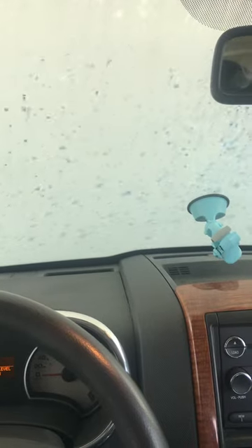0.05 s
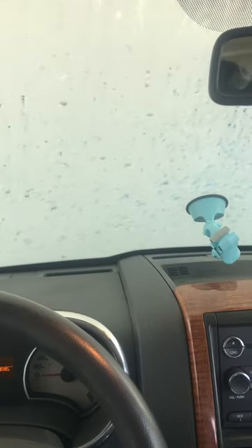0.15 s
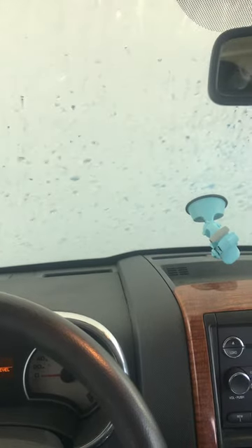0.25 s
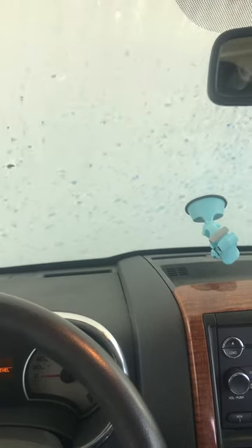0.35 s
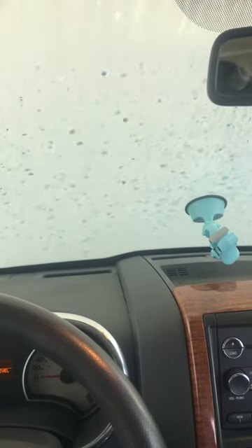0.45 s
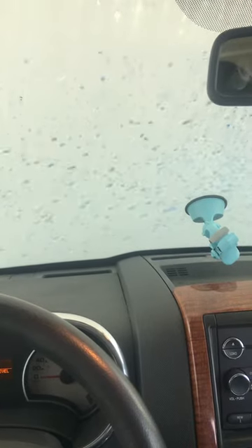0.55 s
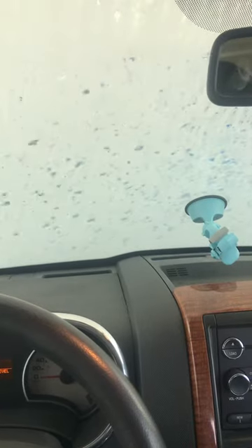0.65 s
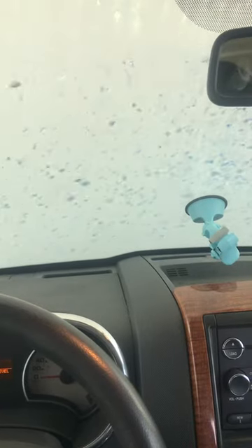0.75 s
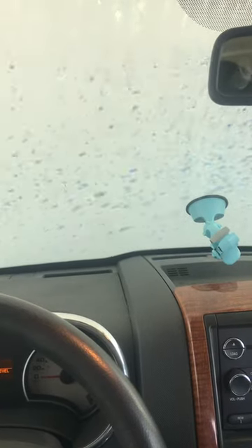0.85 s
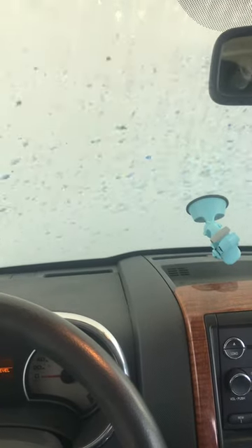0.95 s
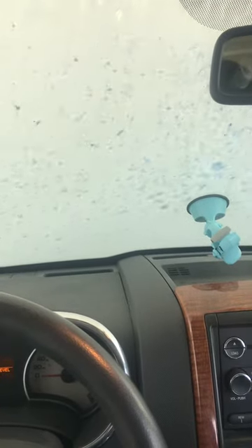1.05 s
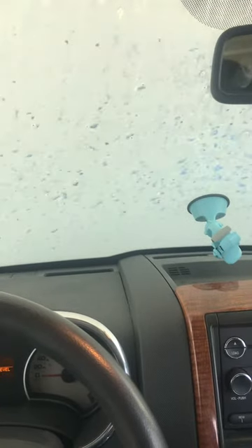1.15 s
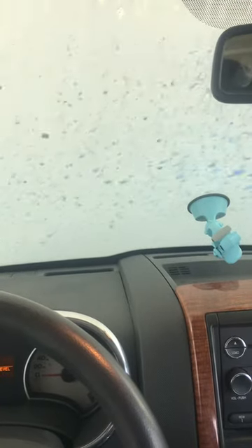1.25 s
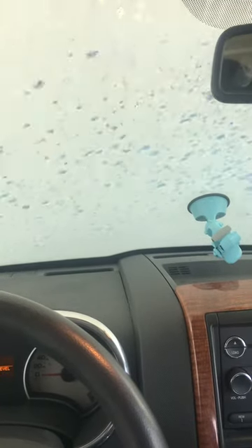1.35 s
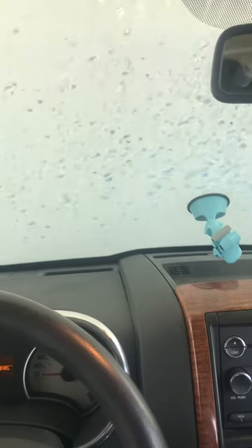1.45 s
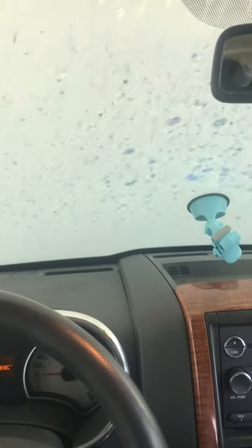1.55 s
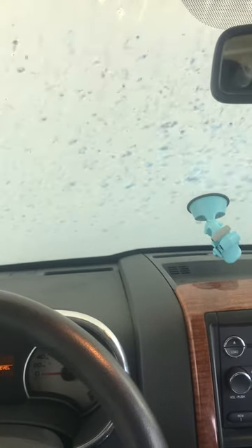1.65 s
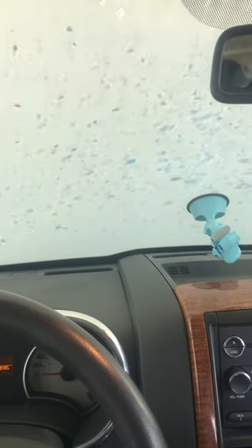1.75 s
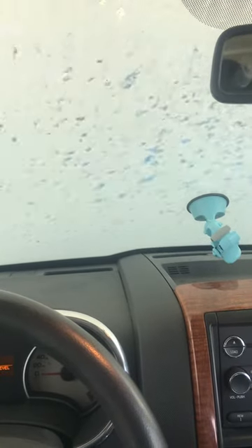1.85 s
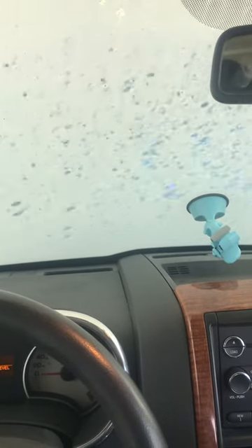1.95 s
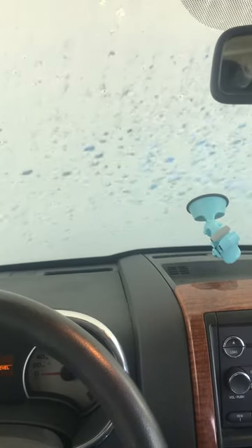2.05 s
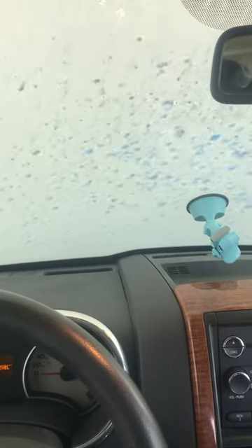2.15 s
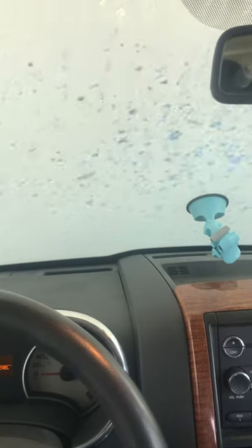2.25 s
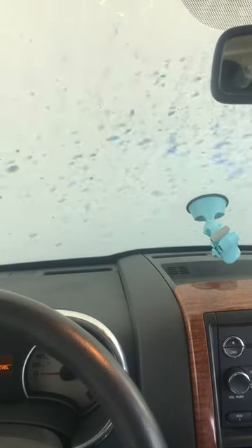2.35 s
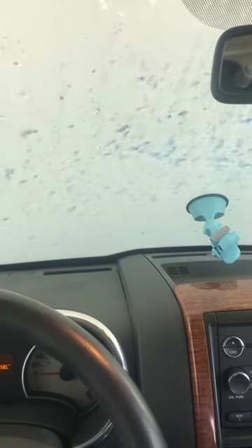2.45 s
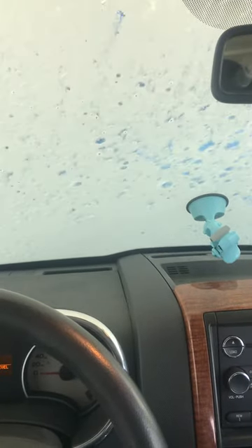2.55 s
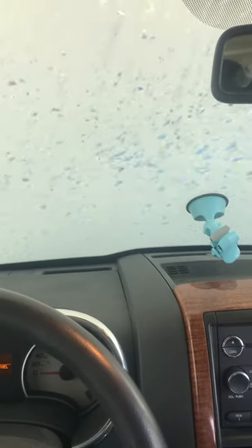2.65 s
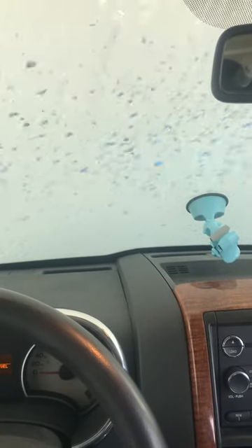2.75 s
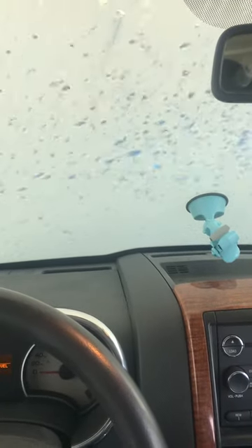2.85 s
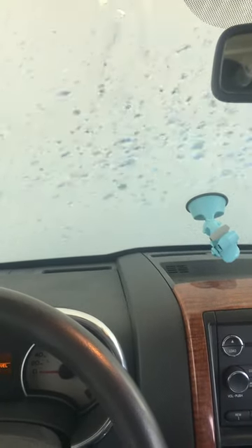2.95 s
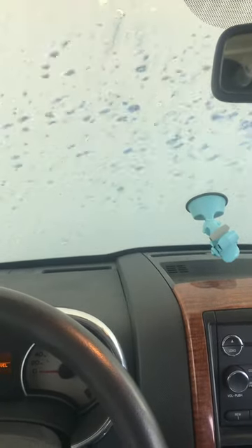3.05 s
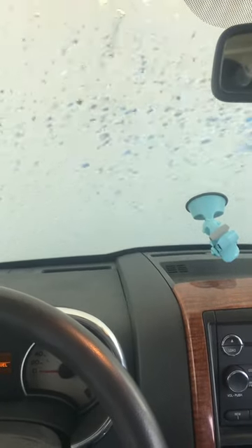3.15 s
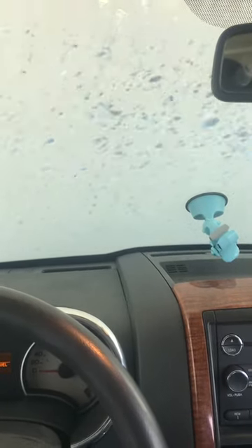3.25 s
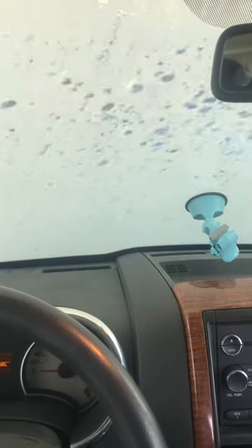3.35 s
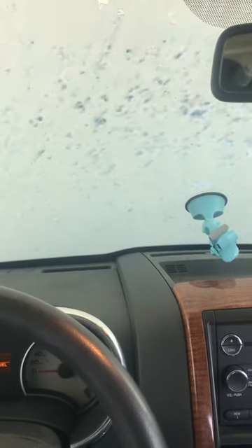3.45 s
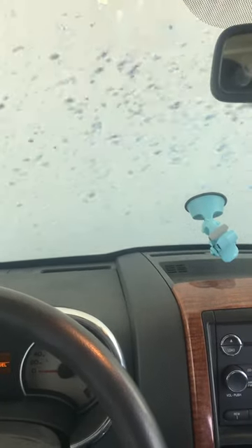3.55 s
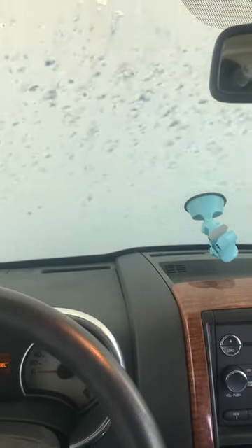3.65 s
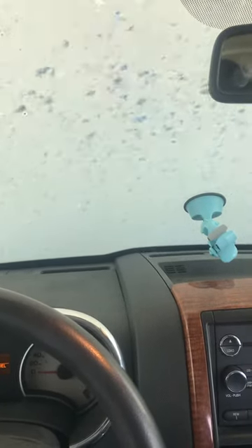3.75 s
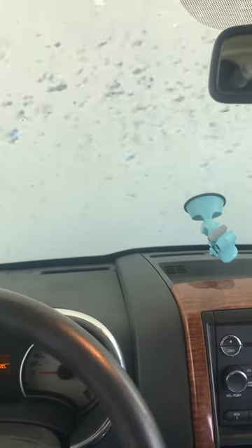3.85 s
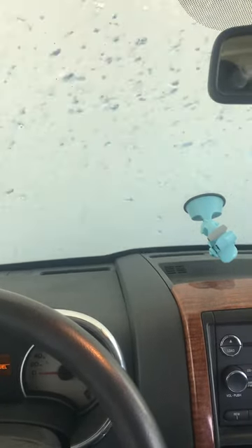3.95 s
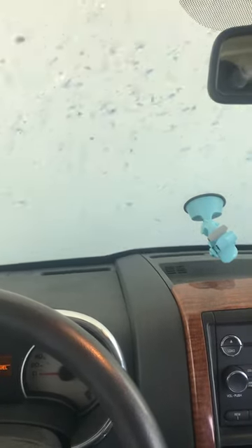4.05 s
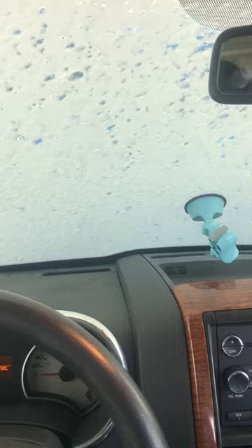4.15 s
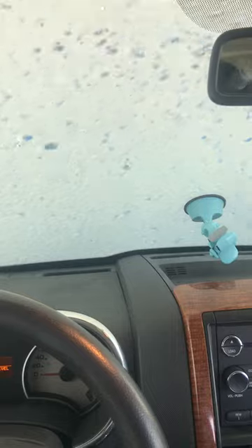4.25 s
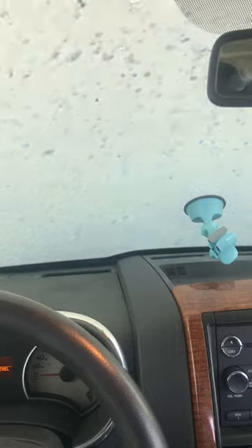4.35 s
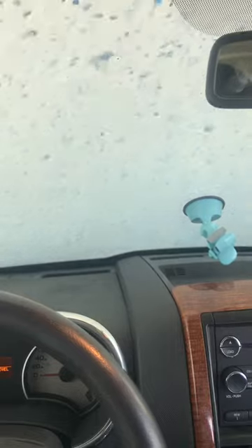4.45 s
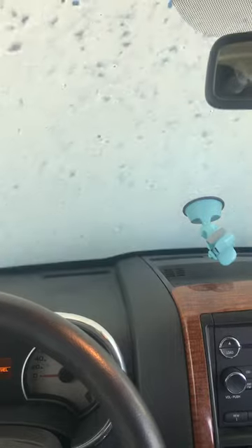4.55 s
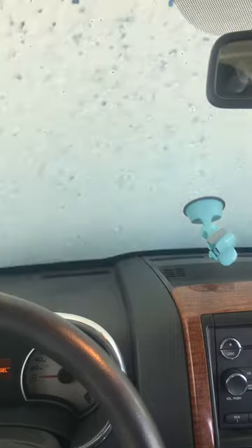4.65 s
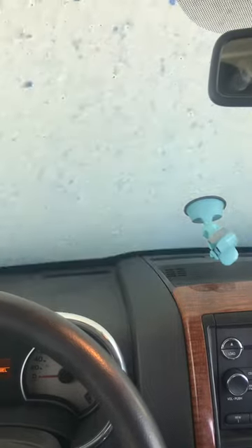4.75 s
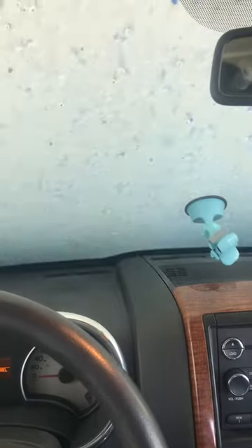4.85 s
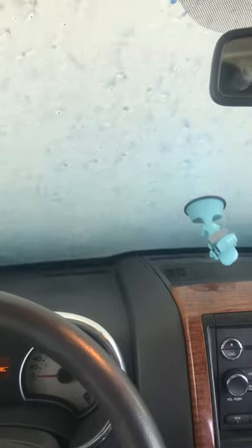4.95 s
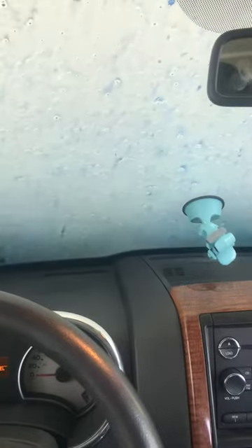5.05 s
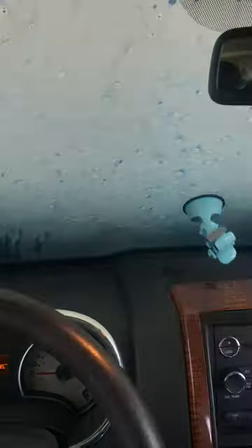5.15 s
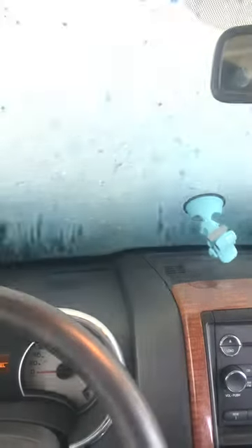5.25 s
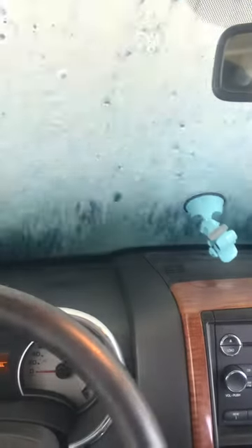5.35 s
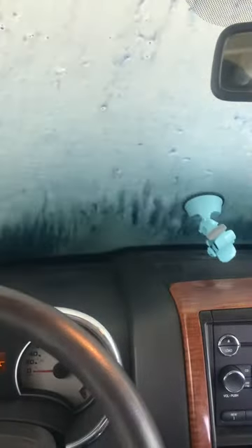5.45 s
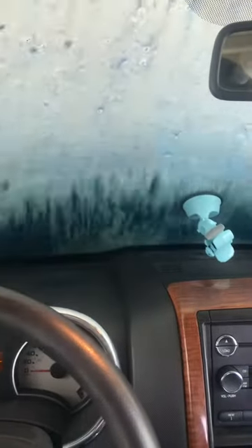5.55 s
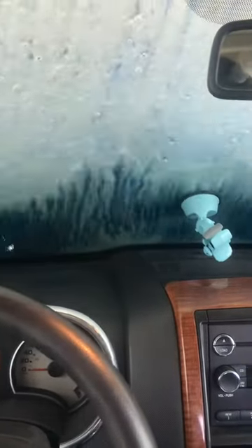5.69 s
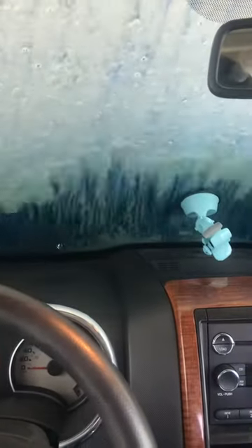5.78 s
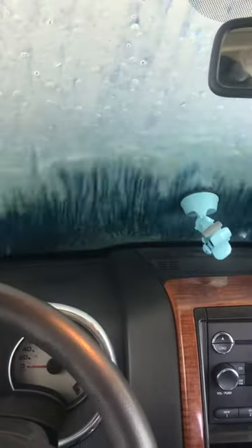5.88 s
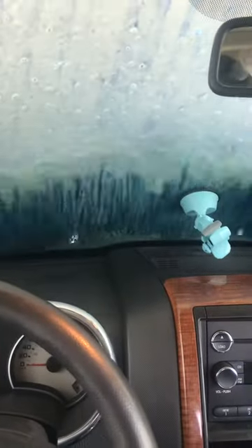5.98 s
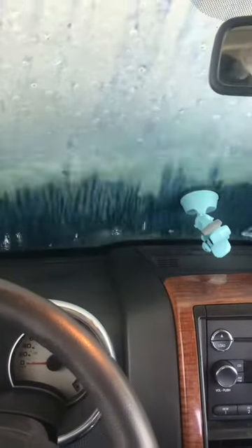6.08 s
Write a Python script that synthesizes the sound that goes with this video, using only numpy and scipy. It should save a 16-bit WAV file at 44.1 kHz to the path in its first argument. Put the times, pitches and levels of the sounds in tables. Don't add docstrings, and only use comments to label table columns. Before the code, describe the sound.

Heard from inside a closed car in a wash: a low, boomy rumble of panels drummed by a spinning cloth brush, with muffled spray hiss and quick irregular swishes. Soft foam knocks dot the trim. Near the end the wet strips hit the windscreen, cracking and tapping, and the hiss grows bright and loud. A phone microphone sits in the padded cabin.

```python
import sys
import numpy as np
from scipy import signal
from scipy.fft import rfft, irfft
from scipy.io import wavfile
from scipy.ndimage import uniform_filter1d

SR = 44100
rng = np.random.default_rng(int(sys.argv[2]) if len(sys.argv) > 2 else 0)


def file_out(sig):
    cols = np.atleast_2d(sig).T
    lim = np.clip(cols, -1, 1)
    pcm = np.round(lim * 32767).astype(np.int16)
    wavfile.write(sys.argv[1], SR, pcm)


def voltage_ratio(decibels):
    exponent = np.asarray(decibels, float) / 20
    return 10 ** exponent


N = 269892
T = np.arange(N) / SR
HZ = np.fft.rfftfreq(N, 1 / SR) + 1e-3

# frequency in Hz, width in Hz, level in dB.
CABIN_MODES = [
    [(35.6, 3.9, -2.5), (53, 6.7, -2), (65, 41, -10)],
    [(101, 15, -1), (107.4, 26.3, 18)],
    [(128.5, 7.4, -11.5), (140.7, 10.8, 0), (163.2, 25.3, -5)],
    [(200.8, 30.3, 0.5), (256, 62, -2), (325.5, 53.5, -0.5), (403.3, 62, -5.5), (463, 25, -12)],
]
DRUM_DB = (-39, -36, -35, -37.5)
DRUM_CONTACT_DB = (-2, -2, 0.5, 0.6)
# peak in seconds, rms level in dB, mode in Hz.
THUMPS = [(0.209, -29.5, 52.6), (0.308, -36, 57), (0.508, -38, 51), (0.676, -37, 49), (0.969, -30.5, 52.4),
          (1.164, -30, 48.4), (1.419, -42, 52), (1.791, -37, 52.4), (2.264, -36, 46.6), (2.555, -33, 47.6),
          (2.723, -34, 53), (2.862, -39, 49.6), (3.035, -35, 51), (3.207, -39, 54), (3.294, -34, 49.6),
          (3.361, -49, 54), (3.486, -32, 52.4), (3.64, -32, 49.6), (3.718, -38, 44.1), (3.808, -36, 55.1),
          (3.962, -46, 46.5), (4.09, -41, 50), (4.212, -36, 49.6), (4.67, -37, 53), (4.801, -33, 64),
          (4.911, -35, 52), (5.094, -29.5, 55.4), (5.465, -30, 38.4), (5.552, -29, 47.7),
          (5.671, -26, 57.3), (5.796, -30, 66.6), (5.898, -38, 70.6), (5.982, -28, 64), (6.063, -31, 71.6)]
# peak in seconds, rms level in dB, panel ring in Hz.
BOOMS = [(0.11, -30, 130.6), (0.403, -31, 116.5), (0.45, -29, 144.6), (0.493, -33, 160.7),
         (0.627, -33, 107.4), (0.656, -30, 157), (0.885, -34, 119.5), (1.042, -30.5, 131.4),
         (1.086, -29.5, 142), (1.219, -28.5, 121), (1.265, -26.5, 103), (1.364, -24, 140),
         (1.492, -37, 111), (1.515, -31, 140.5), (1.602, -27, 158), (1.611, -33, 110.3),
         (1.675, -30.5, 102.5), (1.721, -27, 109.7), (1.866, -30, 120), (2.078, -31, 144.3),
         (2.154, -26, 140.6), (2.247, -32, 144), (2.679, -22.5, 139.5), (2.734, -33, 121),
         (2.804, -30.5, 138.5), (3.207, -23, 128.4), (3.277, -29, 118.7), (3.326, -26.5, 127.3),
         (3.428, -33, 103.7), (3.492, -27.5, 111.2), (3.573, -25, 141.4), (3.64, -29, 149.3),
         (3.825, -23.5, 141.4), (3.872, -28, 132), (3.892, -32, 105), (3.93, -26.5, 136.4),
         (4.017, -28, 107.4), (4.075, -25.5, 129), (4.336, -29, 148.2), (4.51, -26.5, 123.6),
         (4.563, -30.5, 128.6), (4.612, -30, 122), (4.65, -29.5, 116), (4.746, -31.5, 143.8),
         (4.792, -28.5, 144.6), (4.876, -26, 148.3), (4.969, -26.5, 124.7), (5.013, -29.5, 139.6),
         (5.053, -27.5, 119.7), (5.129, -28, 113.6), (5.259, -23.5, 124), (5.306, -23.5, 114),
         (5.349, -24.5, 136.6), (5.399, -23, 132.3), (5.532, -26, 119.2), (5.581, -24, 147.7),
         (5.72, -25, 118), (5.802, -20, 123.0), (5.93, -22.5, 113.5), (5.985, -20.5, 118.2)]
# peak in seconds, rms level in dB, panel ring in Hz.
SLAPS = [(0.122, -40.5, 394), (0.194, -37, 400), (0.647, -35, 200), (0.794, -35, 294), (0.86, -36.5, 404),
         (0.85, -32, 189), (0.958, -35.5, 258), (1.098, -38, 231), (1.165, -39, 415), (1.592, -32.5, 288),
         (1.804, -33, 226), (1.856, -39.0, 366.5), (2.295, -37, 423), (2.606, -40, 382.0),
         (2.714, -38, 288), (2.812, -41, 447), (3.035, -32, 296.5), (3.133, -37, 293), (3.524, -40, 451),
         (3.983, -32, 290), (4.153, -36, 210), (4.177, -39, 402), (4.204, -38, 411), (4.514, -36.5, 402),
         (4.741, -30.5, 268), (4.763, -36, 213.0), (4.807, -37.5, 391), (4.873, -32.5, 200),
         (4.935, -33.5, 305), (4.965, -34, 211), (5.182, -36, 370), (5.25, -33.5, 400), (5.302, -41, 463.0),
         (5.346, -38, 389), (5.372, -39, 397.0), (5.563, -34.5, 374), (5.585, -37, 435), (5.595, -37, 200),
         (5.619, -35, 460), (5.653, -30, 397), (5.729, -29, 405), (5.815, -32, 393), (5.939, -27.5, 342.5),
         (5.98, -27, 341), (6.036, -33, 349.5)]
# peak in seconds, rms level in dB, ring in Hz.
KNOCKS = [(0.059, -40, 1070), (0.531, -41, 717.0), (0.581, -43, 1323.0), (0.782, -49.0, 1370),
          (0.794, -44, 706), (1.58, -43, 880), (1.84, -43, 1300), (1.93, -42, 960), (2.389, -44, 674),
          (2.511, -52, 1130), (2.471, -42, 897), (2.6, -40, 1050), (2.687, -47, 937.0),
          (2.863, -39, 1047.0), (2.943, -46, 600), (2.994, -43, 670), (3.113, -42, 1000), (3.358, -39, 720),
          (3.365, -41, 1240), (3.432, -38, 753.0), (3.437, -40, 1150), (3.43, -42, 1060), (3.526, -42, 955),
          (3.617, -45, 1070), (3.639, -44, 800), (3.714, -44, 834), (3.729, -40, 1220),
          (3.953, -45.5, 698.0), (4.151, -46, 1433.0), (4.152, -49, 1150), (4.157, -45.5, 662.0),
          (4.175, -45, 753.0), (4.221, -45.0, 735.0), (4.225, -36.5, 1158.0), (4.242, -46.5, 1150),
          (4.272, -47, 1300), (4.691, -48, 1158.0)]

# frequency in Hz, level in dB per Hz.
SHELL_SPECTRUM = [(260, -28), (450, 2.5), (615, -5.5), (768, -6), (840, -2), (905, -7), (1050, -8),
                  (1540, -14.5), (2720, -16), (6150, -26), (7800, -32.5), (8780, -33.5), (10300, -36),
                  (12900, -36), (15700, -36.5)]
# frequency in Hz, level in dB per Hz.
GLASS_SPECTRUM = [(260, -30), (450, 3.5), (597, -7), (827, -3), (1150, -9.5), (1520, -6.5), (2410, -3.5),
                  (4600, -7), (4920, -11.5), (6060, -13), (7130, -21.5), (9600, -30.5), (10300, -32.5),
                  (13900, -31), (15700, -32.5)]
# frequency in Hz, width in Hz, boost in dB.
TRIM_MODES = [(857, 30, 3.5), (980, 41, 2.5), (1013, 46, 5), (1085, 29, 3), (1190, 55, 5.5),
              (1290, 50, 5.5), (2410, 50, 3), (2980, 44, 3), (3210, 78, 1.5), (3670, 57, 4),
              (4060, 50, 1.5)]
BAND_EDGES_HZ = (480, 1450, 7600, 20000)
SPRAY_DB = (-45, -50.5, -61.5)
# peak in seconds, hiss level in dB, length in ms.
SWISHES = [(0.061, -49.5, 36), (0.112, -54, 30), (0.157, -49.5, 29), (0.223, -49.5, 35), (0.305, -48.5, 18),
           (0.445, -52, 50), (0.539, -51.5, 81), (0.673, -49.5, 39), (0.762, -53, 49), (0.845, -55, 35),
           (0.888, -49, 25), (0.98, -61, 40), (1.133, -51.5, 47), (1.24, -57, 40), (1.363, -49, 39),
           (1.478, -51, 32), (1.6, -53, 40), (1.72, -57, 32), (1.844, -49, 40), (1.983, -48, 59),
           (2.127, -50.5, 83), (2.284, -50.5, 49), (2.37, -50, 35), (2.45, -50, 45), (2.614, -46.5, 38),
           (2.731, -49, 31), (2.068, -53, 30), (2.816, -51, 26), (2.861, -51, 37), (2.972, -50.5, 41),
           (3.02, -53, 30), (3.097, -50, 53), (3.215, -51, 66), (3.321, -53, 40), (3.378, -54, 42),
           (3.434, -45, 47), (3.536, -50, 92), (3.645, -48, 32), (3.708, -56, 35), (3.78, -53, 30),
           (3.835, -48, 39), (3.929, -49, 65), (3.98, -54, 30), (4.036, -55, 40), (4.138, -48, 56),
           (4.195, -48, 47), (4.279, -48.5, 50), (4.343, -49, 45), (4.42, -52, 45), (4.5, -51.5, 110),
           (4.61, -53, 31), (4.663, -51.5, 29), (4.758, -47.5, 50)]

# time in seconds, pressure in dB.
PRESSURE = [(4.866, -47.5), (5.12, -43.5), (5.22, -38.5), (5.25, -38), (5.41, -36), (5.5, -35), (5.66, -35),
            (5.70, -35), (5.76, -33), (5.84, -33), (5.92, -30.5), (5.97, -31.5), (6.04, -29.5), (6.12, -28)]
# time in seconds, hiss change in dB, treble change in dB.
BUNCHES = [(4.885, -3, 4), (4.925, 0, -3), (5.06, 0, 3), (5.086, -6, -1), (5.15, -5, -5), (5.197, -2, -4),
           (5.223, -7, -9), (5.275, -2, -2), (5.317, 2.5, 2), (5.347, -3, -2), (5.378, 4, 3), (5.408, 3, 6),
           (5.437, -2.5, -2), (5.457, -0.5, -4), (5.49, -1, -7), (5.527, 2, -2), (5.6, -1, -5),
           (5.63, 2, -3), (5.705, -8, -4), (5.723, 2, 1), (5.74, -8, 0), (5.82, 2, 1), (5.838, -2, 2),
           (5.895, 0.5, -3), (5.935, 2, 3), (5.968, 2, -1), (6.022, 5, 3), (6.04, -1, -1), (6.105, -1, -2)]
# peak in seconds, rms level in dB, ring in Hz, top over it in dB.
CRACKS = [(4.8684, -37, 2750, -8), (4.9624, -39, 1660, -12), (4.9726, -47, 1600, -11),
          (5.0488, -46, 3200, -4), (5.1812, -46, 2100, -14), (5.2414, -32, 2500, -11),
          (5.259, -30.5, 4070, -8), (5.3019, -31.5, 3940, -8), (5.309, -37, 4100, -16),
          (5.3844, -35, 2370, -3), (5.3996, -25.5, 2980, -13), (5.462, -35, 1740, -15),
          (5.5095, -32, 2570, -21), (5.5514, -44, 4240, -4), (5.5803, -33, 2120, -19),
          (5.59, -31, 2650, -24), (5.6502, -33.5, 2840, -15), (5.6587, -32.5, 2730, 1),
          (5.727, -28.5, 4270, -20), (5.7479, -29, 2870, -10), (5.7662, -34, 3080, -10),
          (5.8055, -31, 4250, -19), (5.82, -35, 2720, -4), (5.8705, -25.5, 3380, -7),
          (5.9347, -27, 4090, -8), (5.9784, -25, 2933, -22), (5.99, -24.5, 2380, -12),
          (6.0072, -25.5, 3570, -8), (6.0144, -28, 3030, -10), (6.0943, -38, 2600, -10)]
# peak in seconds, level in dB, ring in Hz.
TAPS = [(4.871, -45, 2560.0), (4.8776, -42, 2630.0), (4.8823, -37, 2150.0), (4.8885, -38, 1830.0),
        (4.9038, -34, 2890.0), (4.942, -39.5, 2350.0), (4.9468, -35, 2990.0), (4.9886, -35, 1510.0),
        (5.034, -35, 4070.0), (5.0397, -42, 2800.0), (5.0638, -41.0, 2410.0), (5.074, -39.0, 2730.0),
        (5.1374, -47, 3190.0), (5.158, -31.5, 1590.0), (5.1702, -41, 2670.0), (5.1853, -37.0, 2650.0),
        (5.1961, -40, 2910.0), (5.2003, -40, 3170.0), (5.2045, -38, 4310.0), (5.2104, -34, 1890.0),
        (5.231, -34, 2860.0), (5.246, -41, 3530.0), (5.263, -34, 4410.0), (5.285, -31, 2800.0),
        (5.3205, -38, 4260.0), (5.3361, -39, 2540.0), (5.369, -33, 2860.0), (5.4037, -34, 3230.0),
        (5.409, -36, 3360.0), (5.4153, -32, 2690.0), (5.418, -38, 2800.0), (5.4246, -30, 2390.0),
        (5.4444, -31, 3100.0), (5.514, -33, 2970.0), (5.568, -29, 4610.0), (5.5859, -40, 2970.0),
        (5.5949, -32.0, 2520.0), (5.606, -27, 4500.0), (5.6369, -28.5, 3170.0), (5.664, -31, 3600.0),
        (5.672, -34, 2450.0), (5.679, -31, 3980.0), (5.7317, -32.5, 2780.0), (5.7434, -28, 2070.0),
        (5.7607, -28, 4540.0), (5.776, -30, 4590.0), (5.7975, -29, 3320.0), (5.841, -31, 3200),
        (5.8542, -25, 3920.0), (5.8628, -26, 2300.0), (5.9104, -24, 4350.0), (5.9166, -21, 4220.0),
        (5.923, -26, 2540.0), (5.9287, -21, 4410.0), (5.9842, -25.5, 1810.0), (6.026, -26, 3960.0),
        (6.0539, -24.5, 2410.0), (6.0566, -23.5, 2670.0), (6.085, -25, 2560.0), (6.1119, -23, 5490.0)]
# start in seconds, level in dB.
DROPS = [
    (5.155, -50),
    (5.2485, -51),
    (5.465, -46),
    (5.679, -44),
    (6.102, -42),
]
# peak in seconds, rms level in dB, ring in Hz.
TICKS = [(4.868, -44, 8400), (4.9726, -41, 6000), (5.0536, -44, 6000), (5.0716, -45, 6200),
         (5.1709, -48, 6200), (5.2042, -46, 5200), (5.23, -46, 6100), (5.2496, -42, 13800),
         (5.2624, -41, 14400), (5.3069, -44, 5700), (5.331, -38, 5900), (5.3542, -41, 8300),
         (5.4023, -30, 5600), (5.4119, -40, 6200), (5.425, -36, 5900), (5.4623, -35, 5500),
         (5.4775, -39, 6200), (5.4864, -40, 5600), (5.5247, -42, 8000), (5.5483, -42.5, 6000),
         (5.6063, -34, 6100), (5.6213, -36, 5500), (5.6376, -33, 5800), (5.679, -39, 13600),
         (5.7479, -39, 14000), (5.7607, -39, 6200), (5.7782, -34, 6200), (5.8412, -39, 6000),
         (5.854, -27, 5770), (5.8655, -37, 8300), (5.9309, -36, 6500), (5.98, -34, 6200),
         (6.0075, -33, 5200), (6.018, -28, 5400), (6.0528, -33, 14000), (6.0941, -36, 11300)]
# frequency in Hz, width in Hz, level in dB.
PORT = [
    (4350, 380, 1),
    (4850, 140, -6),
    (7660, 550, -2.5),
    (10470, 570, -4.5),
    (11300, 600, 1),
    (12100, 300, 0),
    (14000, 500, -1),
]

SWISH_THUD_DB, SWISH_TOP_DB = 2, -14
QUICK_BRIGHT_DB = 1
SWISH_RISE, SWISH_FALL = 0.49, 0.45
GUST_DB, GUSTS_PER_S = 0.35, 40
TOUCH_S, TOUCH_RISE_S = 4.864, 0.0084
PANE_DB, PANE_FOLLOWS = -43.5, 0.55
SPATTER_DB = -15
FLOOD_S, FLOOD_DB_PER_S = 5.98, 50
FLUTTER_DB, FLUTTER_PER_S = 0.6, 55
BUNCH_MS = 8.3
CRACK_MS = 2.85
TAP_DB, TAP_TOP_DB, TAP_MS = -7, -15.5, 3.6
SPLASH_DB, SPLASH_MS = -12.5, 8.7
ECHO_MS, ECHO_DB = 110, -16


def unit(x):
    return x / np.sqrt(np.mean(x ** 2))


def bumps_db(peaks):
    return sum(db / (1 + (2 * (HZ - hz) / width) ** 2) for hz, width, db in peaks)


def band_filters(spectrum):
    hz, db = np.transpose(spectrum)
    gain = voltage_ratio(np.interp(np.log(HZ), np.log(hz), db) + bumps_db(TRIM_MODES))
    above = [1 / np.sqrt(1 + (edge / HZ) ** 16) for edge in BAND_EDGES_HZ]
    return [unit(gain * low * np.sqrt(1 - high ** 2)) for low, high in zip(above, above[1:])]


def colour(x, gain):
    return irfft(rfft(x) * gain, N)


def walk(rate):
    hold = int(SR / rate)
    steps = np.repeat(rng.standard_normal(400), hold)[:N]
    return unit(uniform_filter1d(uniform_filter1d(steps, hold), hold))


def droplets(scatter_db, tail_ms, bed):
    sizes = voltage_ratio(scatter_db * np.minimum(rng.exponential(size=N), 4.5))
    sizes = sizes * (rng.random(N) < 0.03)
    decay = np.exp(-1000 / (tail_ms * SR))
    impacts = unit(np.sqrt(signal.lfilter([1], [1, -decay], sizes ** 2)))
    return unit(np.hypot(bed, impacts))


def add(track, s, db, sound):
    at = int(s * SR)
    track[at:at + len(sound)] += voltage_ratio(db) * sound[:len(track) - at]


def burst(noise, rise_ms, fall_ms):
    ms = T[:len(noise)] * 1000
    shape = (1 - np.exp(-ms / rise_ms)) * np.exp(-ms / fall_ms)
    shape = shape / shape.max()
    return shape * noise * np.sqrt(np.sum(shape ** 2) / np.sum((shape * noise) ** 2))


def blows(table, over_db, rise_ms, fall_ms):
    out = np.zeros(N)
    lead_ms = 3 * rise_ms
    ms = T[:8192] * 1000 - lead_ms
    shape = np.exp(-(ms / np.where(ms < 0, rise_ms, fall_ms)) ** 2)
    for (s, db, ring_hz), turn in zip(table, rng.random(len(table))):
        ring = np.sqrt(2) * np.sin(2 * np.pi * (ring_hz * T[:8192] + turn))
        add(out, max(s - lead_ms / 1000, 0), db + over_db, shape * ring)
    return out


def cabin(x):
    tail = rng.standard_normal(8192) * voltage_ratio(-60 * T[:8192] * 1000 / ECHO_MS)
    tail = voltage_ratio(ECHO_DB) * tail / np.sqrt(np.sum(tail ** 2))
    treble = colour(x, 1 / np.sqrt(1 + (1500 / HZ) ** 4))
    return x + signal.fftconvolve(treble, tail)[:N]


def wash():
    out = 0
    grain = droplets(scatter_db=2.4, tail_ms=3.5, bed=1.1)
    grain = grain * voltage_ratio(GUST_DB * walk(GUSTS_PER_S))
    s, hiss_db, ms = np.transpose(SWISHES)
    top_db = SWISH_TOP_DB + QUICK_BRIGHT_DB * np.log2(np.median(ms) / ms)
    bands_over_db = (SWISH_THUD_DB, 0, top_db)
    for gain, spray_db, over_db in zip(band_filters(SHELL_SPECTRUM), SPRAY_DB, bands_over_db):
        power = voltage_ratio(2 * (spray_db + 0.24 * walk(25.27)))
        for at, db, length in zip(s, hiss_db + over_db, ms / 1000):
            near = slice(max(int((at - 0.12) * SR), 0), int((at + 0.12) * SR))
            spread = np.where(T[near] < at, SWISH_RISE, SWISH_FALL) * length
            power[near] += voltage_ratio(2 * db) * np.exp(-((T[near] - at) / spread) ** 2)
        out = out + colour(np.sqrt(power) * grain * rng.standard_normal(N), gain)
    return out


def knocks():
    return blows(KNOCKS + [(5.59, -32, 988)], over_db=0.3, rise_ms=3.1, fall_ms=5.3)


def contact():
    touching = np.clip((T - TOUCH_S) / TOUCH_RISE_S, 0, 1)
    return touching, np.interp(T, *np.transpose(PRESSURE))


def drag():
    touching, hiss_db = contact()
    s, press_db, shine_db = np.transpose(BUNCHES)
    passing = np.exp(-((T[:, None] - s) * 1000 / BUNCH_MS) ** 2)
    thud_db = PANE_DB + PANE_FOLLOWS * (hiss_db + 40)
    top_db = SPATTER_DB + FLOOD_DB_PER_S * np.maximum(T - FLOOD_S, 0)
    flutter = voltage_ratio(FLUTTER_DB * walk(FLUTTER_PER_S))
    grain = touching * droplets(scatter_db=2.6, tail_ms=1.3, bed=0.45) * flutter
    fine = np.sqrt(grain * touching) * droplets(scatter_db=2.0, tail_ms=0.6, bed=0.55)
    thud = touching * voltage_ratio(thud_db + 1.2 * walk(40)) * rng.standard_normal(N)
    hiss = grain * voltage_ratio(hiss_db + passing @ press_db - 3.5) * rng.standard_normal(N)
    top = fine * voltage_ratio(hiss_db + passing @ shine_db + top_db + 1.0) * rng.standard_normal(N)
    return thud, hiss, top


def strike(thud, hiss, top, tip):
    s, db, ring_hz, top_over_db, ms = tip
    noise = rng.standard_normal(2048)
    snap_hz = rng.uniform(8500, 15000)
    ringing = unit(signal.lfilter(*signal.iirpeak(ring_hz, 2.5, fs=SR), noise))
    snap = unit(signal.lfilter(*signal.iirpeak(snap_hz, 1.5, fs=SR), noise))
    start = s - 0.0008
    add(hiss, start, db - 5.0, burst(ringing, 0.12, 0.75 * ms))
    add(hiss, start, db - 6, burst(noise, 0.2, 0.4 * ms))
    add(hiss, start + 0.0005, db + 3, -np.hanning(6))
    add(hiss, start, db + SPLASH_DB, burst(noise[::-1], 1.5, SPLASH_MS))
    add(top, start, db + top_over_db + 0.5, burst(snap, 0.24, 0.65))
    add(top, start, db + top_over_db - 11, burst(noise, 1.5, 6.0))
    add(thud, start, db - 6.5, burst(noise, 0.81, 7.1))


def windscreen():
    thud, hiss, top = drag()
    cracks = [(*row, CRACK_MS) for row in CRACKS]
    taps = [(s, db + TAP_DB, hz, TAP_TOP_DB, TAP_MS) for s, db, hz in TAPS]
    for tip in cracks + taps:
        strike(thud, hiss, top, tip)
    for s, db in DROPS:
        noise = rng.standard_normal(1024)
        add(top, s, db, burst(noise, 0.2, 0.87))
        add(hiss, s, db - 2.0, burst(noise, 0.2, 0.85))
    return sum(colour(x, gain) for x, gain in zip((thud, hiss, top), band_filters(GLASS_SPECTRUM)))


def ticks():
    return blows(TICKS, over_db=1.2, rise_ms=0.22, fall_ms=0.7)


def panel_blows():
    booms = blows(BOOMS, over_db=-0.3, rise_ms=17.0, fall_ms=24.0)
    slaps = blows(SLAPS, over_db=-1.2, rise_ms=9.7, fall_ms=12.2)
    thumps = blows(THUMPS, over_db=-0.74, rise_ms=28.53, fall_ms=32.0)
    return booms + slaps + thumps


def drumming():
    out = 0
    touching, pressure_db = contact()
    for modes, steady_db, over_db in zip(CABIN_MODES, DRUM_DB, DRUM_CONTACT_DB):
        power = sum(voltage_ratio(2 * db) / (1 + (2 * (HZ - hz) / width) ** 4) for hz, width, db in modes)
        ring = unit(colour(rng.standard_normal(N), np.sqrt(power)))
        swell = uniform_filter1d(ring ** 2, size=1500)
        level = np.hypot(voltage_ratio(steady_db), touching * voltage_ratio(pressure_db + over_db))
        out = out + level * unit(ring / swell ** 0.2)
    return out


def scene():
    bright = wash() + knocks() + windscreen() + ticks()
    panels = panel_blows() + drumming()
    return (panels + cabin(bright))[None]


def band_limit(x):
    return signal.sosfilt(signal.butter(12, 15820, fs=SR, output="sos"), x)


def record(dry):
    bass_cut = 1 / np.sqrt(1 + (30 / HZ) ** 16)
    top_cut = 1 / np.sqrt(1 + (HZ / 15800) ** 120)
    mix = colour(dry, bass_cut * top_cut * voltage_ratio(bumps_db(PORT)))
    return band_limit(mix)


dry = scene()
out = record(dry)
file_out(out)
```